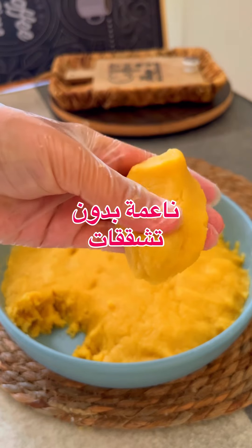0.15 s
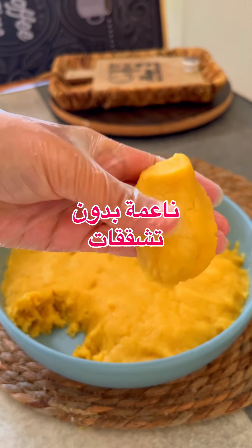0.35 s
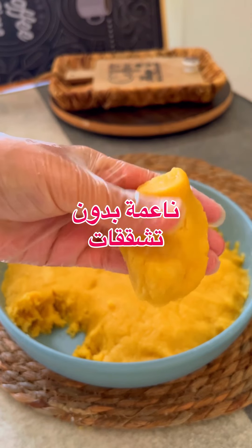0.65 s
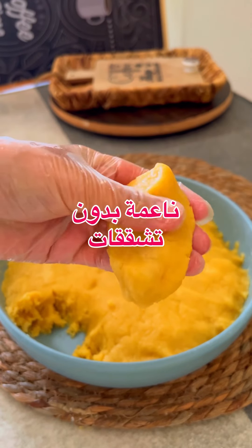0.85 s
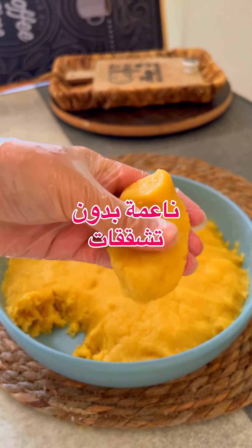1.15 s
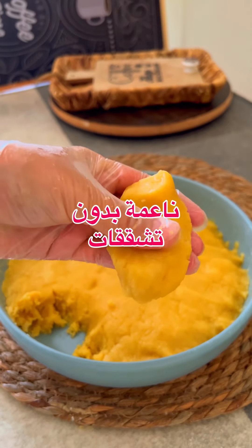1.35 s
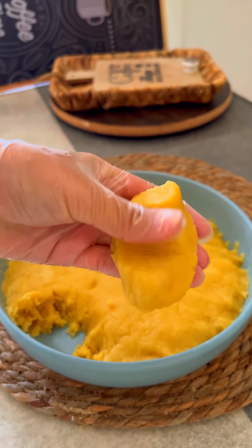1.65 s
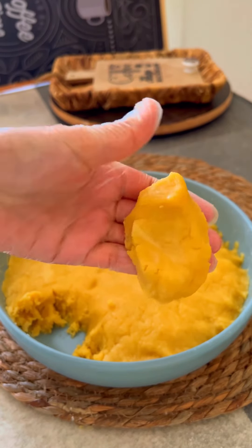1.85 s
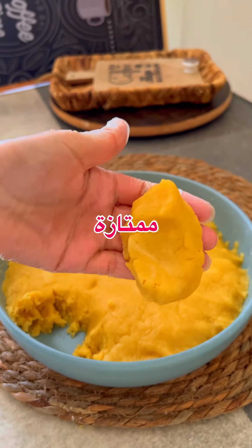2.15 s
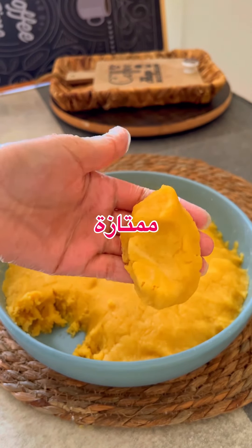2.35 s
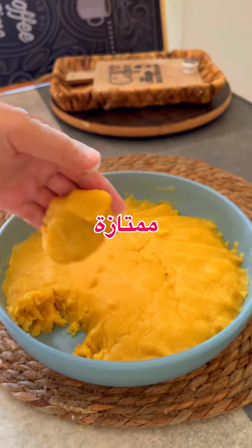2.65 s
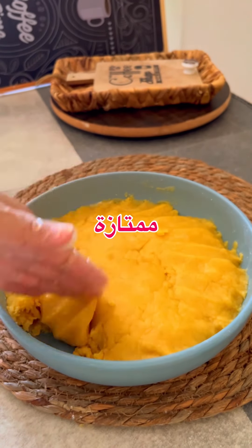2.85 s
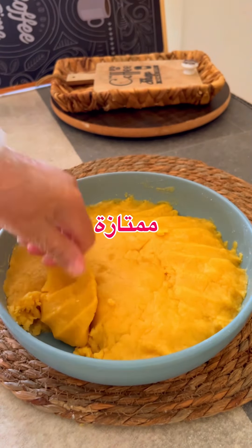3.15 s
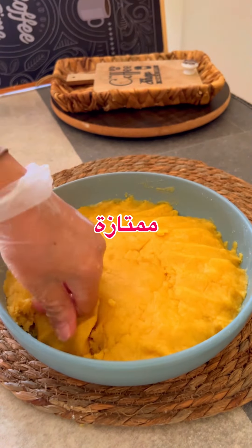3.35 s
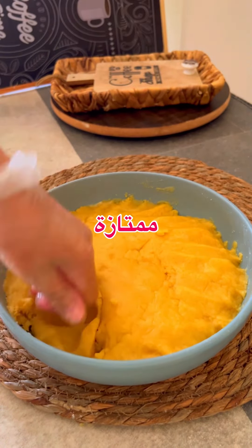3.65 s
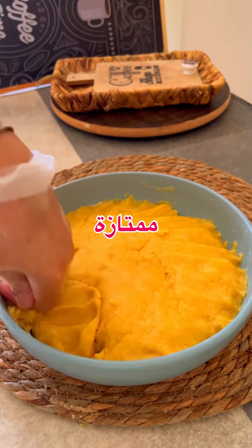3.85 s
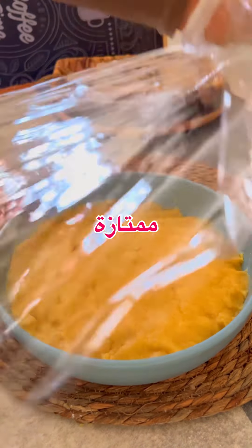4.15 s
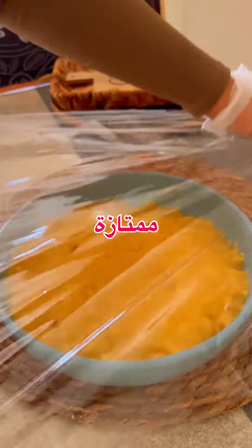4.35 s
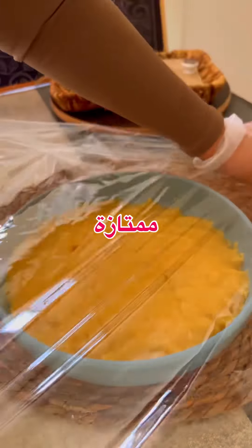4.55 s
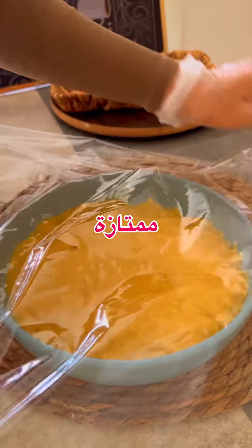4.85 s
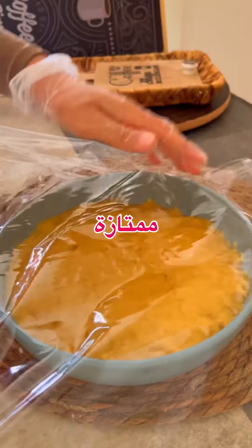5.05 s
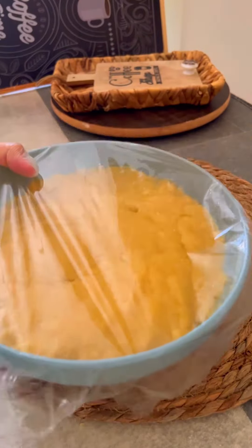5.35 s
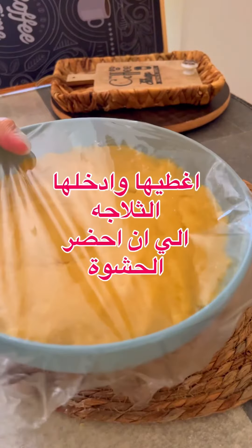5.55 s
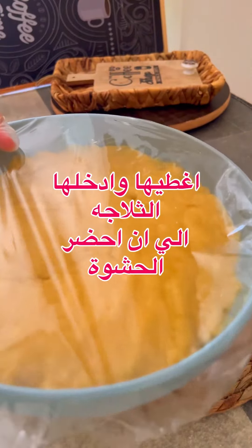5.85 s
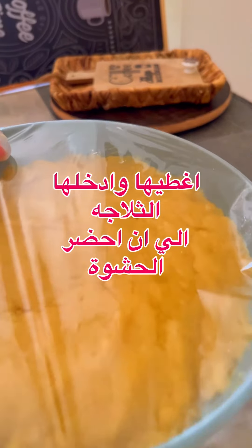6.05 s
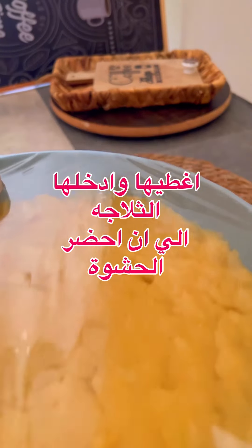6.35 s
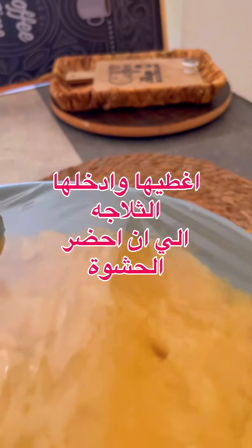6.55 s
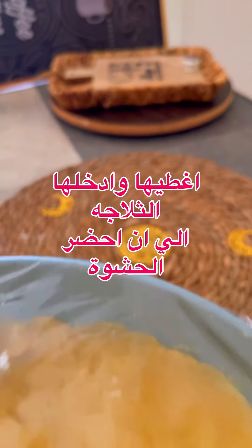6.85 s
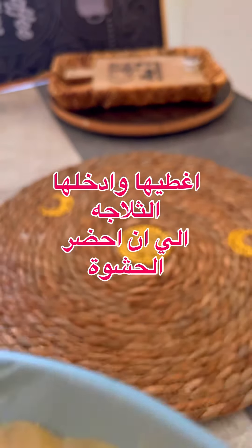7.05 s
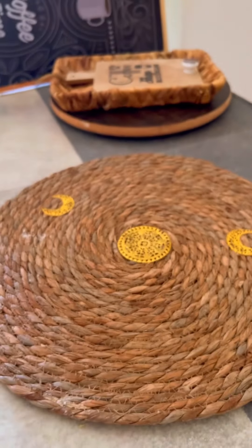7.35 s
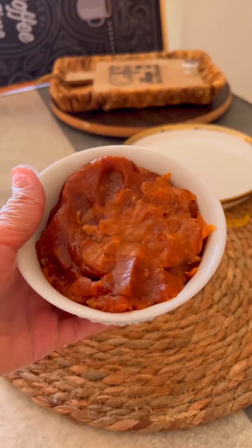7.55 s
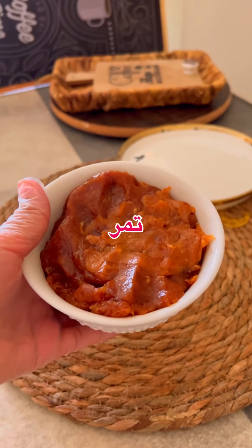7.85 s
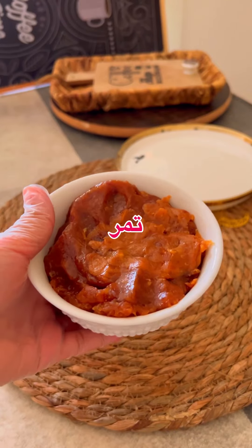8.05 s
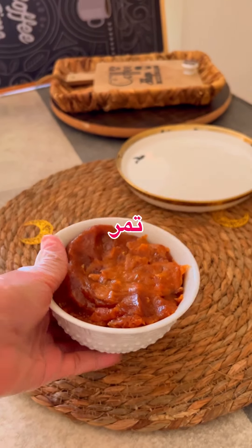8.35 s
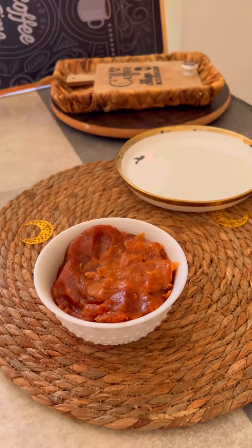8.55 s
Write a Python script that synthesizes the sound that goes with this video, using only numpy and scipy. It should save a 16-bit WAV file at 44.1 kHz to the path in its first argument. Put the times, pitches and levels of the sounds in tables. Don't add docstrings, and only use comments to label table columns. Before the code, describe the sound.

In a small kitchen, a gloved hand presses dough close to the microphone: sparse crisp ticks and faint squish, becoming firmer and denser. Cling film is then pulled over the bowl in loud, bright crackles with dull knocks. After that it is nearly quiet, with a few light touches and small clicks, before a closing burst of sharp crackle. A low, beating refrigerator hum runs throughout.

```python
import sys
import numpy as np
from scipy import signal
from scipy.fft import rfft, irfft
from scipy.io import wavfile

SR = 44100
rng = np.random.default_rng(int(sys.argv[2]) if len(sys.argv) > 2 else 0)


def int16_out(signal):
    q = np.round(np.clip(np.atleast_2d(signal).T, -1, 1) * 32767)
    wavfile.write(sys.argv[1], SR, q.astype(np.int16))


def volts_from_db(level):
    exponent = np.asarray(level, float) / 20
    return 10 ** exponent


N = 383662

SHAFT_HZ, MAINS_HZ = 57.87, 120.0
FADE_IN_S = 0.024
KITCHEN_T60_S, WALL_CUT_HZ = 0.24, 11300

# (start [s], crest of the hum's beat [s], mains buzz level [dB])
TAKES = [
    (0.0, 0.425, -69.5),
    (3.95, 4.069, -68),
    (5.33, 5.4597, -59),
    (7.4953, 7.691, -56),
    (8.431, 8.523, -55),
]
# (time [s], shaft tone [dB], second order [dB], fourth order [dB])
COMPRESSOR_ORDERS = [
    [(0.0, -67, -47, -64), (0.51, -53.5, -49.5, -71), (1.25, -60, -48, -56.5), (1.54, -55.5, -46.5, -69),
     (1.94, -53, -60.5, -55), (2.28, -57, -47.5, -63), (2.42, -52.5, -44.5, -59.5),
     (3.1, -60.5, -52.5, -68), (3.29, -57, -59, -90), (3.53, -81, -55, -70), (3.63, -56, -50.5, -61),
     (3.83, -60, -53, -75), (3.95, -58, -55, -55)],
    [(3.96, -58.5, -53.5, -61), (4.03, -61, -48, -56.5), (4.47, -61, -49.5, -59.5), (4.68, -58, -49, -64),
     (5.03, -64, -52, -60), (5.22, -61, -52, -65), (5.32, -57, -56, -74), (5.44, -54.5, -48, -65.5),
     (6.23, -58, -53, -67), (7.01, -61.5, -49, -59), (7.32, -53.5, -50, -67.5), (7.49, -55, -49.5, -63)],
    [(7.5, -58, -56, -62), (7.606, -81, -63.5, -65), (7.916, -59, -62, -63), (8.082, -62, -57, -86),
     (8.16, -62, -67, -66.5), (8.7, -71, -76, -60.5)],
]
# (multiple of shaft rate, level [dB])
WEAK_ORDERS = [(3, -78), (6, -74.5)]
# (pitch [Hz], width [Hz], level [dB])
CABINET_MODES = [(48.8, 1, -63), (104.7, 2.8, -63.5), (161.3, 4.4, -70), (177.7, 3, -65.5),
                 (193.36, 4.7, -59), (217.3, 1.3, -69.5), (312.3, 4.8, -69), (347.6, 3.8, -68.5),
                 (373.3, 4.3, -71.5), (900, 31, -81.5)]
# (time [s], low rumble [dB], room air [dB])
BACKGROUND = [(0, -56.5, -71.5), (1.5, -56.5, -72), (2.8, -54.5, -73), (3.2, -57.5, -72), (3.95, -57, -70),
              (3.96, -57.5, -73.5), (5.33, -57.5, -72.5), (5.34, -59, -75), (7.49, -57.5, -75),
              (7.5, -65.5, -75), (8.7, -64, -76)]
# (frequency [Hz], density [dB per Hz])
RUMBLE_SPECTRUM = [(25, -15.5), (50, -6.5), (75, -16.5), (130, -12), (200, -10.5), (300, -11.5),
                   (390, -16.5), (450, -22), (560, -39.5), (900, -66.5)]
# (frequency [Hz], density [dB per Hz])
AIR_SPECTRUM = [(290, -20.5), (500, -2), (660, -5.5), (930, -2), (1700, -19), (3300, -22.5), (5100, -30.5),
                (6000, -25.5), (6900, -27.5), (7500, -21.5), (8100, -26.5), (10500, -31), (16000, -35.5)]
# (frequency [Hz], correlation [-1..1])
ROOM_LIKENESS = [(60, 0.94), (130, 0.9), (290, 1), (640, -0.35), (1410, -0.64), (3100, 0.045),
                 (6820, 0.043), (15000, 0.34)]
# (time [s], fine crinkle [dB], coarse crinkle [dB], squish [dB], body [dB])
RUB_STROKES = [
    [(0.0, -86, -83, -82, -73), (0.16, -94, -103, -99, -75), (0.29, -67, -68, -68, -75.5),
     (0.36, -92, -89, -86, -76), (0.39, -76, -64, -73, -74), (0.53, -99, -100, -96, -72),
     (0.61, -89, -93, -93, -70), (0.65, -51, -56.5, -70, -69), (0.67, -83, -76, -78, -70),
     (0.73, -81, -77, -75, -76), (0.75, -64, -76, -73, -72), (0.77, -87, -78, -81, -76),
     (0.95, -100, -101, -95, -74.5), (1.05, -60, -65, -74, -69), (1.06, -68, -67, -61, -72),
     (1.11, -91, -92, -89, -73), (1.14, -68, -65, -63, -74), (1.16, -83, -92, -90, -71),
     (1.27, -102, -99, -107, -73), (1.4, -70, -83, -85, -69), (1.45, -99, -99, -81, -75),
     (1.49, -72.5, -89, -75, -68.5), (1.57, -111, -97, -95, -72), (1.65, -62.5, -69.5, -83, -65.5),
     (1.73, -94, -77, -68.5, -70.5), (1.81, -75, -63, -66.5, -68.5), (2.2, -103, -102, -98, -69)],
    [(2.45, -106, -105, -100, -68), (2.586, -75, -73, -71.5, -67), (2.688, -94, -94, -93, -68.5),
     (2.77, -60.5, -56, -61.5, -68.5), (2.862, -57, -67, -66, -67), (2.884, -69.5, -70, -71.5, -70),
     (3.034, -62, -64, -63.5, -70.5), (3.072, -78, -75, -86, -68), (3.13, -83, -71, -81, -73),
     (3.168, -55, -55, -55.5, -66), (3.226, -73.5, -72, -77.5, -72), (3.582, -79, -79.5, -75, -74.5),
     (3.606, -60, -56, -56.5, -68), (3.664, -53, -66, -57, -65), (3.686, -72, -66, -72, -74),
     (3.752, -54, -47.5, -67, -75), (3.812, -54.5, -57.5, -59, -60), (3.866, -73, -69, -67, -77),
     (3.95, -71, -68, -72, -72)],
    [(3.985, -48, -58, -60, -61), (4.003, -66.5, -68, -64.5, -71.5), (4.309, -74, -75.5, -73, -75),
     (4.325, -52, -56, -65, -60.5), (4.359, -66, -66, -66, -77), (4.369, -51, -52.5, -53, -57.5),
     (4.395, -58, -54, -67.5, -61), (4.407, -54, -54, -52, -65), (4.449, -59, -63, -59.5, -55),
     (4.545, -54.5, -56.5, -55.5, -58), (4.661, -59, -61.5, -62.5, -62), (4.789, -59.5, -58, -53, -58),
     (4.841, -79, -77.5, -74, -70), (5.065, -71.5, -70.5, -74, -85.5), (5.081, -59, -63, -57.5, -59),
     (5.137, -49, -48.5, -49.5, -47.5), (5.253, -55, -56, -55.5, -53.5), (5.33, -58.5, -61, -63, -52)],
    [(5.34, -71, -74, -78, -74), (5.382, -93, -89.5, -85, -81), (5.472, -102, -101, -99, -77),
     (5.482, -79, -85, -92, -88), (5.5, -103, -106, -99, -83)],
    [(6.4, -99, -103, -96, -76), (6.584, -75, -74.5, -74, -79), (6.67, -88.5, -88, -91, -78),
     (6.694, -78, -75.5, -79, -65), (6.704, -91, -79, -89, -78), (6.814, -107, -106, -103, -86),
     (6.856, -92, -76, -100, -86), (6.88, -103, -92, -102, -83.5), (7.0, -107, -106, -103, -85)],
    [(7.2, -107, -105, -97, -80), (7.278, -93, -102, -89, -85), (7.362, -82, -78, -74, -66),
     (7.372, -62.5, -61, -89, -72), (7.388, -76, -74, -82, -79), (7.48, -99, -92, -86, -85.5)],
    [(8.05, -104, -103, -87, -87), (8.198, -77, -79, -82, -76.5), (8.23, -51.5, -70, -72, -80),
     (8.286, -89, -96, -86, -94), (8.318, -79, -75.5, -83, -81), (8.426, -55.5, -52.5, -60.5, -64),
     (8.446, -73, -68.5, -67, -77), (8.596, -47.5, -50.5, -57, -60), (8.602, -72, -58.5, -64, -74),
     (8.7, -67, -66, -69, -70)],
]
RUB_PART_HZ = [9000, 5900, 3000, 1100]
# (frequency [Hz], level [dB])
FOIL_COLOUR = [(450, -8.5), (700, -3.5), (1200, -3), (1800, -5.5), (2300, -3), (4800, -5), (6100, 3.5),
               (7400, -1), (10300, 5.5), (16500, -0.5)]
# (frequency [Hz], correlation [0..1])
HANDS_LIKENESS = [(450, 0.37), (1000, 0.87), (8000, 0.93), (12000, .15)]
# (time [s], peak [dB], pitch [Hz], dull part re crack [dB])
SNAPS = [(0.2034, -64, 2640, -22), (0.2803, -49.5, 5770, -23), (0.621, -52, 8240, -20),
         (0.6497, -40, 9400, -23), (0.7342, -57, 2650, -12), (0.7473, -43.5, 3030, -18),
         (0.778, -50.5, 9370, -22), (1.0156, -46.5, 10100, -18), (1.047, -36.5, 8800, -22),
         (1.1393, -49, 9200, -24), (1.3369, -59.5, 5255, -3), (1.3728, -54, 9220, -17),
         (1.3962, -49, 10400, -17), (1.483, -53.5, 2540, -16), (1.6487, -44, 8550, -26),
         (1.7584, -66, 3400, -11), (1.7584, -53.5, 2570, -11), (1.7744, -46.5, 2640, -5),
         (1.7938, -52, 6330, -15), (1.8145, -43.5, 5820, -12), (2.0225, -54.5, 4926, -4),
         (2.7187, -58, 6260, -5), (2.7596, -46.5, 6100, -19), (3.149, -44, 9430, -29),
         (3.3777, -49, 7600, -17), (3.596, -47, 8270, -11), (3.604, -37, 5780, -10),
         (3.64, -34.5, 5950, -14), (3.6647, -39, 6030, -9), (3.7115, -41, 6270, -23),
         (3.9772, -30, 5760, -20), (4.0433, -43, 9760, -15), (4.0868, -43.5, 6500, -28),
         (4.1475, -54, 5560, -9), (4.185, -41.5, 8530, -9), (4.2223, -43, 9440, -19),
         (4.2403, -38, 9830, -22), (4.278, -47, 6460, -24), (4.3243, -44, 7740, -24),
         (4.3243, -33, 8260, -26), (4.3682, -33.5, 6380, -3), (4.4041, -28.5, 9500, -18),
         (4.4565, -48.5, 6040, -9), (4.5123, -37.5, 6550, -2.5), (4.5652, -31, 8500, -24),
         (4.6924, -41, 3750, 0), (4.6924, -39, 8940, -14), (4.7109, -30, 10500, -11),
         (4.7363, -37.5, 8150, -12), (4.7583, -37.5, 6770, -20), (4.7753, -27, 8800, -24),
         (4.889, -58, 6300, -11.5), (4.905, -45.5, 5240, -25.5), (4.9623, -47, 6300, -17.5),
         (5.0347, -50.5, 3690, -23), (5.0771, -47, 7520, -6.5), (5.0771, -39, 6300, -11),
         (5.127, -41, 2510, 3), (5.127, -31, 3730, -15), (5.1694, -39, 6830, -11), (5.2217, -44, 8780, -13),
         (5.4805, -65.5, 8260, -5.5), (5.7738, -70, 3810, -4), (5.8616, -67, 2880, -14),
         (5.9055, -52.5, 6400, -27.5), (6.1465, -67.5, 3070, -8), (6.5137, -54.5, 3630, -9),
         (6.5753, -45.5, 9080, -26), (6.6907, -53, 6200, -17), (6.8514, -59, 6140, -17),
         (7.3722, -40, 6800, -28), (7.4942, -53, 2970, -4.5), (7.5797, -60.5, 3600, -26),
         (7.9848, -66.5, 2530, -14), (8.2133, -55, 7930, -19), (8.23, -45.5, 10000, -33),
         (8.3629, -56, 7570, -19), (8.3834, -49, 6100, -20), (8.5122, -32, 11100, -17),
         (8.5907, -25, 9400, -19)]
KNOCK_S = [
    2.851,
    4.548,
    5.088,
    5.123,
]
# (peak [dB], pitch [Hz], t60 [s])
KNOCKS = [
    (-43, 560, 0.021),
    (-41.5, 1600, 0.016),
    (-39, 1300, .03),
    (-28.5, 1280, 0.018),
]
# (frequency [Hz], gain [dB])
PORT_RESPONSE = [(9800, 0.5), (10800, -4.5), (11500, -12), (12400, -15), (13500, -11.5), (15000, -6.5),
                 (15900, -11.5), (16400, -42)]


def rms_one(x):
    return x / np.sqrt(np.mean(x ** 2) + 1e-20)


def at_hz(points, hz):
    table = np.array(points)
    return np.interp(np.log(hz), np.log(table[:, 0]), table[:, 1])


def in_time(rows):
    time_s, *columns = np.transpose(rows)
    return [np.interp(np.arange(N) / SR, time_s, column) for column in columns]


def by_take():
    rows, t = np.array(TAKES), np.arange(N) / SR
    index = np.maximum(np.searchsorted(rows[:, 0], t, "right") - 1, 0)
    now = rows[index].T
    return t - now[0], now[1:]


def drift(rate_hz):
    pole = np.exp(-16 * np.pi * rate_hz / SR)
    settle = 8000
    noise = rng.standard_normal(N // 8 + settle + 2)
    slow = signal.lfilter([1], [1, -2 * pole, pole * pole], noise)[settle:]
    return np.interp(np.arange(N) / 8, np.arange(len(slow)), rms_one(slow))


def shaped(x, points):
    bin_hz = np.arange(1, N // 2 + 2) * SR / N
    return irfft(rfft(x) * volts_from_db(at_hz(points, bin_hz)), N)


def ring(x, hz, t60_s):
    radius, w = volts_from_db(-60 / (t60_s * SR)), 2 * np.pi * hz / SR
    return signal.lfilter([0, np.sin(w)], [1, -2 * radius * np.cos(w), radius * radius], x + 1e-18)


def diffuse():
    mid, side = rfft(rng.standard_normal((2, N)))
    hz, alike = np.transpose(ROOM_LIKENESS)
    bin_hz = np.arange(1, len(mid) + 1) * SR / N
    alike = np.clip(np.interp(np.log(bin_hz), np.log(hz), alike), -1, 1)
    return irfft(np.sqrt(1 + alike) * mid + np.sqrt(1 - alike) * side * [[1], [-1]], N)


def refrigerator(crest_s, mains_db, rumble_db):
    t = np.arange(N) / SR - crest_s
    turn = 2 * np.pi * SHAFT_HZ * t
    shaft_db, second_db, fourth_db = in_time(np.vstack(COMPRESSOR_ORDERS))
    tones = volts_from_db(shaft_db) * np.sin(turn + 0.8)
    tones += volts_from_db(second_db) * np.cos(2 * turn)
    tones += volts_from_db(fourth_db) * np.sin(4 * turn)
    for order, db in WEAK_ORDERS:
        tones += volts_from_db(db + 2.0 * drift(2.6)) * np.sin(order * turn)
    tones += volts_from_db(mains_db) * np.cos(2 * np.pi * MAINS_HZ * t)
    fan = diffuse()
    stirred = 0
    for hz, width_hz, db in CABINET_MODES:
        stirred = stirred + volts_from_db(db + 57) * rms_one(ring(fan, hz, 2.6 / width_hz))
    return np.sqrt(2) * tones + volts_from_db(rumble_db) * stirred


def room_tone(rumble_db, air_db):
    rumble = volts_from_db(rumble_db - 0.5) * rms_one(shaped(diffuse(), RUMBLE_SPECTRUM))
    air = volts_from_db(air_db + 0.47 * drift(3.4)) * rms_one(shaped(diffuse(), AIR_SPECTRUM))
    return rumble + air


def buckles(per_s, spread_db):
    clump = volts_from_db(4.0 * drift(30.0))
    sizes = volts_from_db(spread_db * np.minimum(rng.exponential(1, N), 5)) * rng.choice([-1, 1], N)
    return rms_one(sizes * (rng.random(N) < per_s * clump / SR))


def rubbing():
    parts_db = np.array(in_time(np.vstack(RUB_STROKES)))
    wide = buckles(per_s=350., spread_db=5.5)
    small = buckles(per_s=6000., spread_db=4.5)
    edges_hz = 450 * 2 ** np.arange(0, 5.3, 0.25)
    dealt = rng.integers(0, 7, N)
    hiss = rng.standard_normal((2, 2, N))
    out = 0
    for k, (low_hz, high_hz) in enumerate(zip(edges_hz, edges_hz[1:])):
        hz = np.sqrt(low_hz * high_hz)
        alike = np.clip(at_hz(HANDS_LIKENESS, hz), 0, 1)
        own = 2.6 * small * (dealt == k % 7) + 0.9 * hiss[k % 2, 0]
        both = [own + 1.17 * wide, np.abs(own) * hiss[k % 2, 1]]
        band = signal.butter(2, [low_hz, high_hz], "band", fs=SR, output="sos")
        mid, side = signal.sosfilt(band, both)
        share = [np.interp(np.log(hz), np.log(RUB_PART_HZ[::-1]), one) for one in np.eye(4)[::-1]]
        gain = volts_from_db(share @ parts_db + at_hz(FOIL_COLOUR, hz) - 6.5 + 2.6 * drift(16.0))
        stereo = np.sqrt(1 + alike) * rms_one(mid) + np.sqrt(1 - alike) * rms_one(side) * [[1], [-1]]
        out = out + gain * stereo
    return out


def snaps():
    length = 900
    out, t = np.zeros((2, N + length)), np.arange(length) / SR
    bursts = rng.standard_normal((len(SNAPS), 3, length))
    pans_db = rng.normal(0, 1.5, len(SNAPS))
    dull = signal.butter(2, [700, 2500], "band", fs=SR, output="sos")
    wide = signal.butter(2, [2500, 16000], "band", fs=SR, output="sos")
    for (start_s, db, hz, dull_db), (a, b, c), pan_db in zip(SNAPS, bursts, pans_db):
        around = signal.butter(2, [hz / 1.34, hz * 1.42], "band", fs=SR, output="sos")
        crack = signal.sosfilt(around, a * (np.exp(-t / 0.00081) + 0.14 * np.exp(-t / 0.0052)))
        tick = signal.sosfilt(wide, c * np.exp(-t / 0.0005))
        thud = signal.sosfilt(dull, b * np.exp(-t / 0.0021))
        snap = crack / np.abs(crack).max()
        snap = snap + 0.53 * tick / np.abs(tick).max()
        snap = snap + volts_from_db(dull_db - 3.5) * thud / np.abs(thud).max()
        start = round(start_s * SR)
        out[:, start:start + length] += volts_from_db(db + pan_db * np.array([[1], [-1]])) * snap
    return out[:, :N]


def knocks():
    length = 4000
    out, t = np.zeros(N), np.arange(length) / SR
    grits = rng.standard_normal((len(KNOCKS), length))
    for start_s, (db, hz, t60_s), grit in zip(KNOCK_S, KNOCKS, grits):
        contact = grit * t * np.exp(-t / 0.0021)
        rung = ring(contact, hz, t60_s)
        rung = rung + 0.93 * ring(contact, 1.45 * hz, 0.27 * t60_s)
        rung = rung + 0.5 * ring(contact, 2.9 * hz, 0.22 * t60_s)
        start = round(start_s * SR)
        out[start:start + length] += volts_from_db(db) * rung / np.abs(rung).max()
    return out


def kitchen(x):
    t = np.arange(SR // 2) / SR
    tail = rng.standard_normal((2, len(t))) * volts_from_db(-60 * t / KITCHEN_T60_S) * (t > 0.003)
    tail = signal.sosfilt(signal.butter(1, WALL_CUT_HZ, fs=SR, output="sos"), tail)
    tail = tail / np.sqrt(np.sum(tail ** 2) / 2)
    return signal.fftconvolve(x[None], tail, axes=1)[:, :N]


def scene():
    _, (crest_s, mains_db) = by_take()
    rumble_db, air_db = in_time(BACKGROUND)
    hands = rubbing() + snaps() + knocks()
    behind = refrigerator(crest_s, mains_db, rumble_db) + room_tone(rumble_db, air_db)
    return hands + volts_from_db(-14) * kitchen(hands.mean(0)) + behind * volts_from_db([[-0.45], [0.45]])


def low_pass(x):
    return signal.sosfilt(signal.butter(12, 16640, fs=SR, output="sos"), x)


def record(dry):
    since_s, _ = by_take()
    first_take = np.arange(N) / SR < TAKES[1][0]
    fade = np.where(first_take, 1, np.clip(since_s / FADE_IN_S, 0, 1))
    heard = shaped(dry, PORT_RESPONSE)
    heard = signal.sosfilt(signal.butter(3, 36, "high", fs=SR, output="sos"), heard)
    return low_pass(heard * fade)


dry = scene()
out = record(dry)
int16_out(out)
```